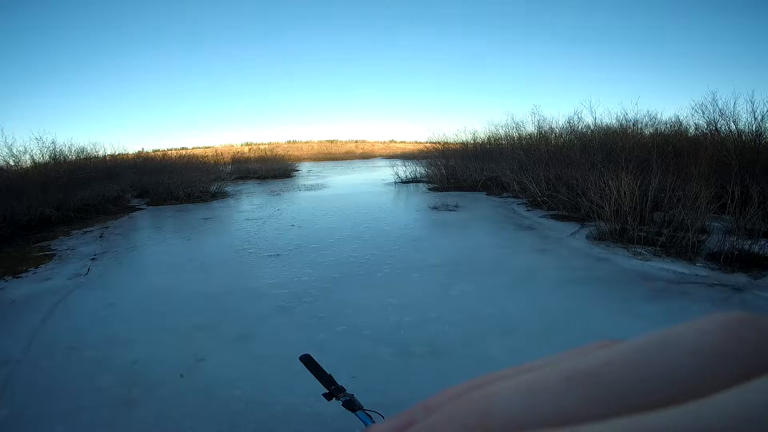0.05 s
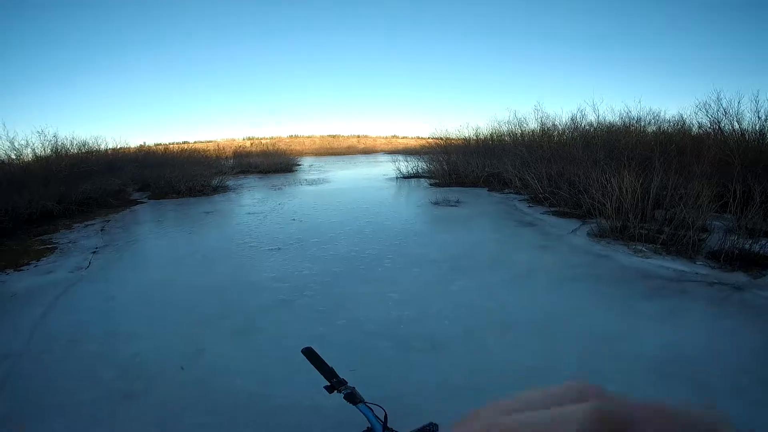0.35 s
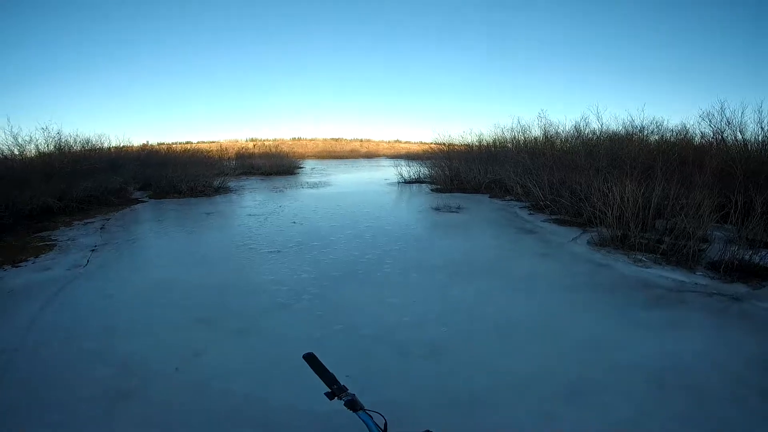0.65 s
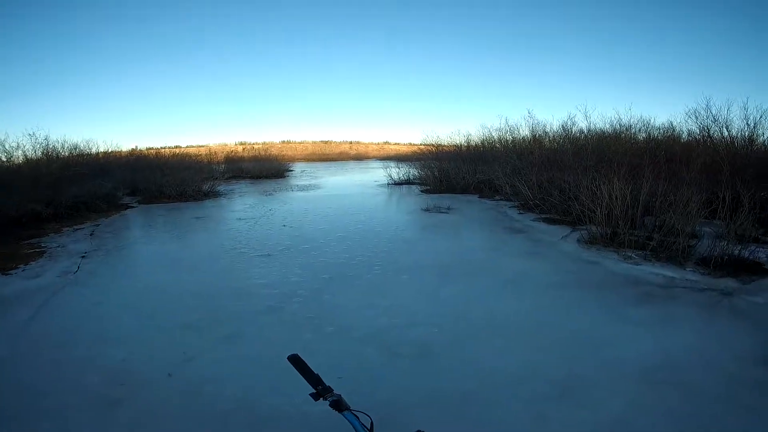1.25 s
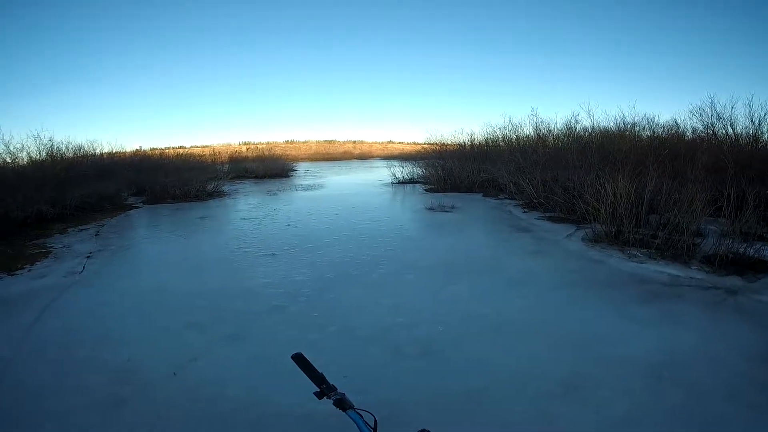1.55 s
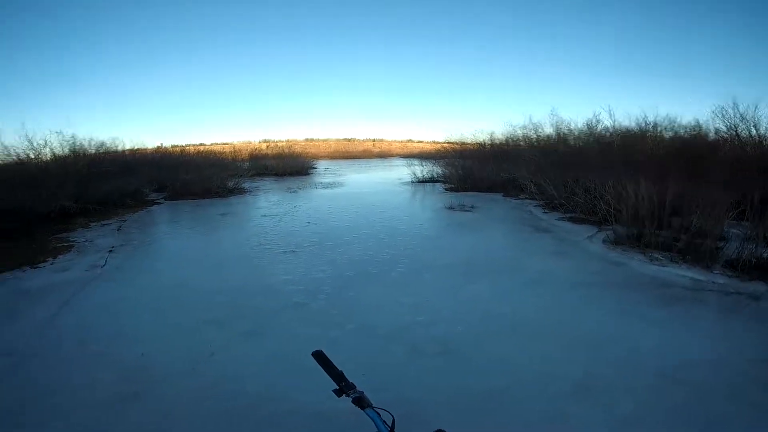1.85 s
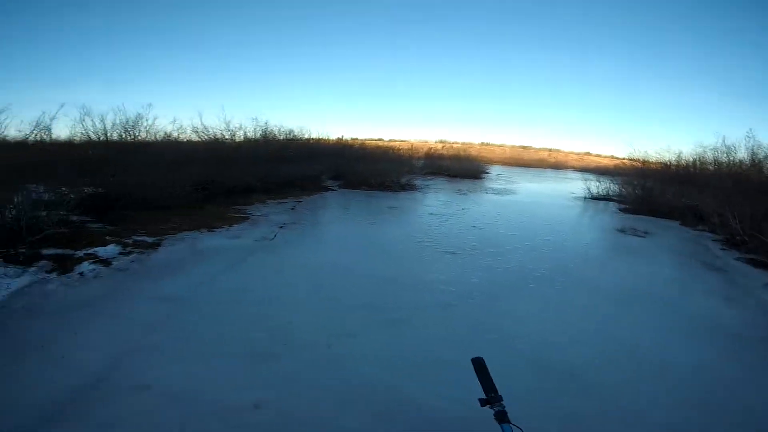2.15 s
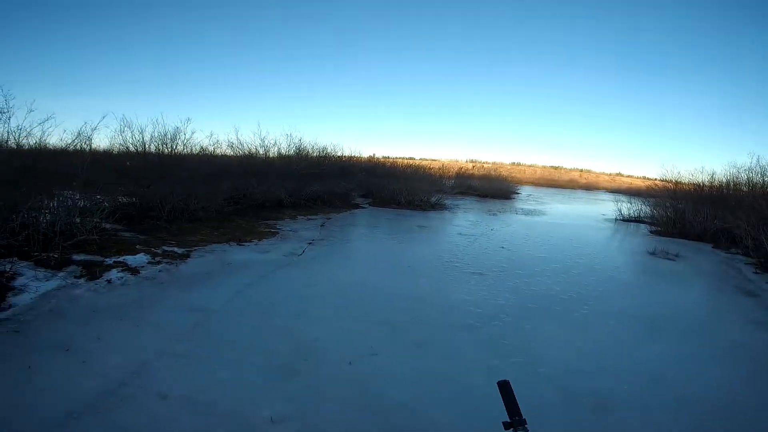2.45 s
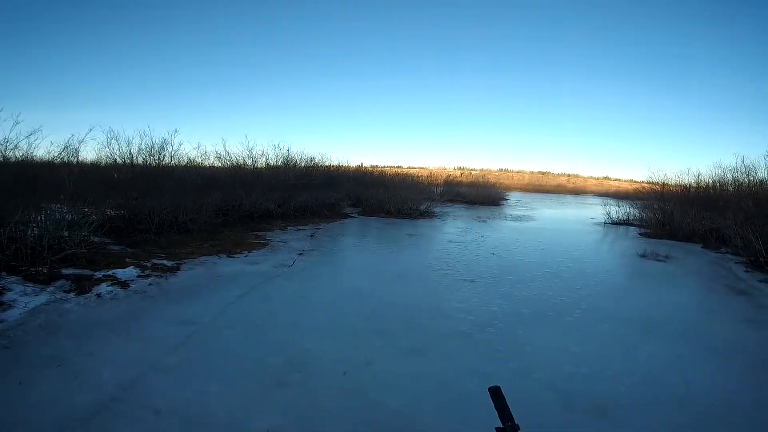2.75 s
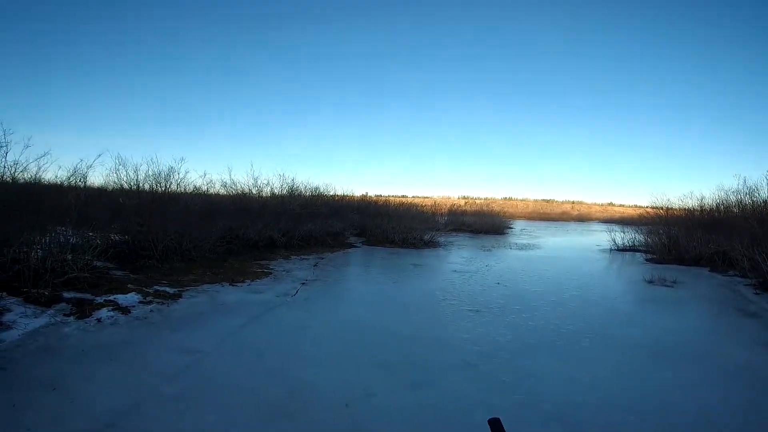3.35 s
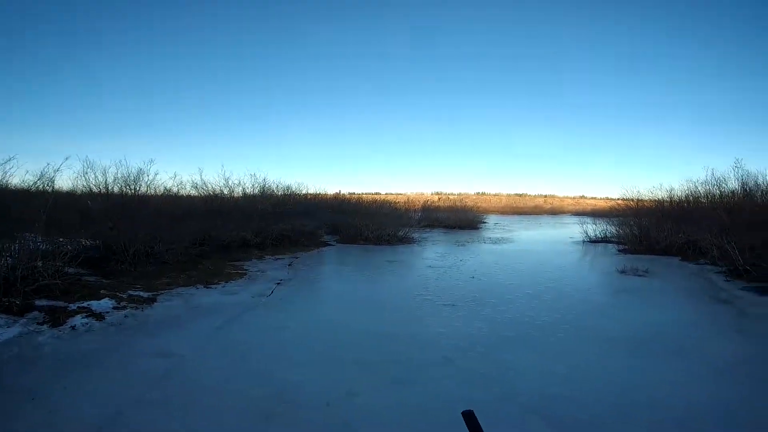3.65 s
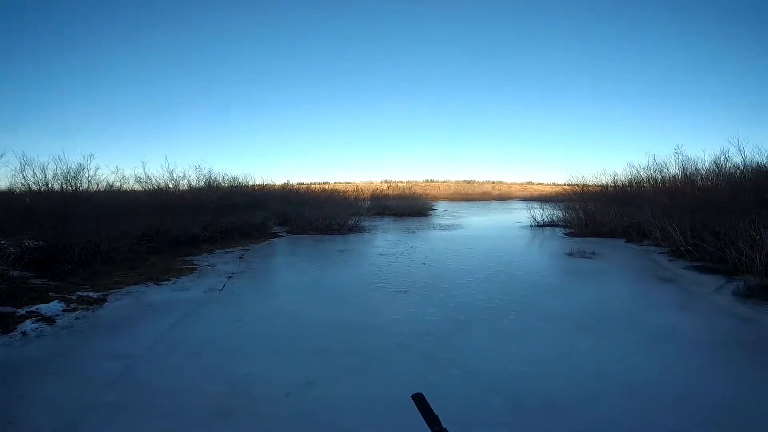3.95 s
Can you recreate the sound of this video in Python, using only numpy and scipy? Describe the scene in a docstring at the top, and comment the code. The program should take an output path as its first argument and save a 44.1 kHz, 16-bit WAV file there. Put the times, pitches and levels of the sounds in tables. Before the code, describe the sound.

Bicycle tyres roll and crunch over ice while wind buffets the microphone.

```python
"""A bicycle rolls over a frozen pond, heard from a camera on the rider. Sharp clacks and a short scuff
open the ride as it fades in. Then the tyres roar and crunch finely on the ice, a part of the bike rubs
in short sizzles and small knocks pass, while wind buffets the microphone and the camera's electronics
whine. Near the end the biggest wind thump lands; a limiter ducks after it, as after the opening clacks."""
import sys
import numpy as np
from scipy import signal
from scipy.fft import rfft, irfft
from scipy.io import wavfile
from scipy.ndimage import uniform_filter1d, minimum_filter1d

SR = 44100
rng = np.random.default_rng(int(sys.argv[2]) if len(sys.argv) > 2 else 0)


def inscribe(sig):
    """Save sig as 16-bit PCM at rate SR to the path in sys.argv[1].

    A 1-D sig is mono; a 2-D sig holds one channel per row.
    Samples are clipped to [-1, 1] before scaling.
    """
    pcm = np.round(np.clip(np.atleast_2d(sig).T, -1, 1) * 32767)
    wavfile.write(sys.argv[1], SR, pcm.astype(np.int16))


N = 176400
TIME = np.arange(N) / SR

# tone of the microphone's steady hiss (f/Hz, level/dB)
HISS_EQ = [(1000, -2.5), (4000, -12.5), (8800, -11), (9600, 0), (10400, -8), (12000, -2.5), (13800, 0.5),
           (14800, -10), (15500, -7)]
# faint tones beside the electronic whine (f/Hz, level/dB)
SIDE_TONES = [(7173, -63), (13486, -66), (14010, -65), (14683, -62), (14907, -63)]

# swells of the wind bed (t/s, level/dB)
WIND_ENVELOPE = [(.3, -18.5), (.5, -24), (.75, -27), (1.1, -29), (1.25, -36), (1.6, -33), (1.85, -24.5),
                 (2.2, -27), (2.55, -29.5), (2.85, -28.5), (3.0, -34), (3.3, -34), (3.6, -23), (3.78, -31),
                 (3.95, -25.5)]
# its deep rumble (f/Hz, level/dB)
WIND_EQ = [(10, -25), (25, 1), (45, 1), (75, -3.5), (110, -14), (200, -22.5), (400, -35), (1000, -96)]
# fluttering gusts (middle t/s, length/s, level/dB, upper edge f/Hz)
GUST_CUES = [(0.404, 0.073, -28.5, 216), (0.459, 0.032, -19, 181), (0.553, 0.025, -15.5, 130.6),
             (0.668, 0.074, -27.5, 125), (1.017, 0.027, -15, 81.4), (1.053, 0.014, -25.5, 195),
             (1.825, 0.062, -19.5, 116), (1.995, .04, -15, 110), (2.054, 0.069, -21, 112),
             (2.244, 0.057, -20.5, 86), (2.469, 0.03, -23.5, 125), (2.537, 0.064, -26, 110),
             (3.522, 0.0096, -20.5, 220), (3.646, .045, -15.5, 163), (3.829, 0.024, -17, 206),
             (3.929, 0.025, -17.5, 80.4)]
# single eddies that thump the microphone (t/s, peak level/dB, f/Hz)
EDDY_CUES = [(1.556, -14.5, 41.2), (1.691, -17.5, 48), (2.382, -10, 50.7), (3.076, -15.5, 44.8),
             (3.408, -24.5, 38.3), (3.5373, 6.5, 184), (3.574, -4.5, 39.8), (3.841, -10, 46)]

# light rubs on the bike (middle t/s, level/dB)
RUB_CUES = [(.81, -47), (.995, -46), (1.08, -48.5), (1.115, -52), (1.226, -48), (1.355, -47), (1.53, -48.5),
            (1.565, -57), (1.653, -48.5), (1.83, -46.5), (1.963, -47), (2.167, -52), (2.243, -52),
            (2.337, -50), (2.475, -48), (2.605, -48), (2.767, -47), (2.928, -49), (3.077, -49),
            (3.2, -48.5), (3.325, -47.5), (3.475, -48), (3.624, -46.5), (3.775, -49), (3.97, -47)]
# their high sizzle (f/Hz, level/dB)
RUB_EQ = [(3000, -33), (7500, -17), (8250, -6.5), (8900, -19), (9400, -0.5), (9900, 2), (10350, -18),
          (11000, -1), (11700, -5.5), (12600, -12), (15000, -18)]

# knocks of the bike and ticks in the ice (t/s, ring level/dB, ring f/Hz, tick level/dB)
KNOCK_CUES = [(.503, -24, 920, -54), (0.549, -31, 1360, -41), (.69, -28, 810, -54), (1.562, -27, 700, -55),
              (1.954, -21, 1123, -49), (2.459, -47, 890, -37), (2.531, -32, 910, -31.5),
              (2.698, -21, 830, -28), (2.718, -20.5, 563, -34), (2.925, -23.5, 780, -32.5),
              (3.268, -25.5, 440, -40.5), (3.684, -19, 434, -34.5), (3.798, -21, 493, -45)]
# bright edge of the ticks (f/Hz, level/dB)
TICK_EQ = [(1000, -29), (2000, 1), (3100, 3), (4500, -6), (7000, -9), (11000, -7), (15000, 1)]

# hard clacks close to the microphone (t/s, level/dB, t60/s)
CLACK_CUES = [(0.2727, -48, .04), (.2835, -18, 0.012), (0.2915, -33.5, 0.029), (.301, -46, 0.044),
              (0.308, -19, 0.077), (0.313, -28, .02), (0.3134, 0.5, 0.013)]
# their resonances (f/Hz, level/dB)
CLACK_EQ = [(100, -6), (600, -1), (850, -9), (1180, -0.5), (1600, -6), (2300, -6), (3000, 0.5),
            (3500, -2.5), (4400, -6), (5150, 1.5), (6600, -9.5), (8600, -9), (9600, 1.5), (11000, -1.5),
            (12500, -7), (15500, -18)]
# the scuff after them (t/s, level/dB)
SCUFF_ENVELOPE = [(.314, -66), (.32, -27.5), (.34, -26), (.346, -24), (.356, -23.5), (.36, -76)]
# its bright scrape (f/Hz, level/dB)
SCUFF_EQ = [(500, -11), (1800, -12), (3300, 0), (4800, -1), (5800, -7), (6400, 0), (8200, -2.5), (10700, 3),
            (12600, -2), (13400, -3), (15500, -12)]

# swells of the tyre roar, ahead of its trim (t/s, level/dB)
ROAR_ENVELOPE = [(0.38, -47), (0.48, -36.5), (0.62, -43), (0.74, -42), (0.83, -35), (1.0, -44.5),
                 (1.15, -47.5), (1.45, -45), (1.58, -40), (1.72, -43.5), (1.9, -40), (2.12, -41.5),
                 (2.3, -41), (2.55, -43), (2.65, -39.5), (2.85, -44), (3.07, -42), (3.33, -44.5),
                 (3.48, -40.5), (3.7, -40), (3.97, -38.5)]
# its hollow body (f/Hz, level/dB)
ROAR_EQ = [(60, -14), (200, -3.5), (400, -0.5), (600, -1), (830, 0), (1000, -5), (1180, -7), (1380, -17.5),
           (1600, -38.5), (2100, -31), (4000, -83)]
# swells of the tyres' higher rasp (t/s, level/dB)
RASP_ENVELOPE = [(.35, -49.5), (.5, -43), (.85, -44.5), (1.15, -58), (1.5, -56), (1.8, -52.5), (2.1, -46.5),
                 (2.3, -41), (2.55, -43.5), (2.85, -49.5), (3.1, -46.5), (3.33, -51.5), (3.5, -44),
                 (3.75, -45.5), (3.97, -40.5)]
# its narrow midrange (f/Hz, level/dB)
RASP_EQ = [(500, -34.5), (900, -6), (1130, -1.5), (1330, -4), (1480, -9), (1650, -27), (3000, -44.5)]
# hiss of ice grit under the tread, ahead of its trim (t/s, level/dB)
GRIT_ENVELOPE = [(0.38, -54), (0.47, -46), (0.53, -38), (0.6, -46.4), (0.68, -44), (0.75, -50.5),
                 (0.9, -50.5), (1.0, -51.5), (1.17, -57.5), (1.28, -53), (1.43, -58.5), (1.53, -50.5),
                 (1.6, -48.5), (1.75, -60), (1.9, -51.5), (2.08, -56.5), (2.2, -48.5), (2.42, -50.5),
                 (2.57, -48.5), (2.85, -52.5), (3.05, -50.5), (3.35, -57), (3.5, -55), (3.78, -52.5),
                 (3.9, -47.5), (3.98, -47)]
# its crisp top (f/Hz, level/dB)
GRIT_EQ = [(800, -7), (1700, -8.5), (2200, -5.5), (2900, 1), (3500, -2), (4100, -8.5), (5300, -5.5),
           (6600, -8), (7400, -4), (8400, -12.5), (9800, -4.5), (12000, -2), (13500, -21.5), (15500, -48)]

# fader over everything but the clacks and scuff (t/s, level/dB)
RIDE_FADER = [(0, -69), (.135, -75), (.155, -32.5), (.28, -17), (.4, 0.5), (.48, 0)]

WHINE_HZ, BUZZ_HZ, BUZZ_DEPTH, WHINE_DB, HISS_DB = 14346.5, 112.3, 0.68, -43.3, -50
GUST_ROLLOFF_DB_PER_OCTAVE = 25.5
KNOCK_T60_S, TICK_T60_S, KNOCK_RASP_GAIN = 0.025, 0.032, 0.39
GRAINS_PER_S, ROAR_TRIM_DB, GRIT_TRIM_DB = 2600, 1.5, 2.5
CEILING_DB, RELEASE_DB_PER_S, HIGH_CUT_HZ = -2, 74, 15500


def amp(db):
    """Decibels to gain."""
    return 10 ** (np.asarray(db) / 20)


def unit(x):
    """Scales to rms 1."""
    return x / np.sqrt(np.mean(x ** 2) + 1e-20)


def noise():
    """White noise for the whole scene."""
    return rng.standard_normal(N)


def envelope(points):
    """Gain over time from (t/s, level/dB) points."""
    return amp(np.interp(TIME, *np.transpose(points)))


def eq(x, points):
    """Minimum-phase EQ through (f/Hz, relative level/dB) points; white noise keeps its power."""
    hz, db = np.transpose(points)
    bins_hz = abs(np.fft.fftfreq(8192, 1 / SR))
    gain = unit(amp(np.interp(np.log(bins_hz + 1), np.log(hz), db)))
    response = np.exp(np.conj(signal.hilbert(np.log(gain))))
    taps = np.fft.ifft(response).real
    return signal.fftconvolve(x, taps[:len(taps) // 2])[:N]


def waver(rate_hz, depth_db):
    """A random gain that wanders at up to about rate_hz."""
    hz = np.fft.rfftfreq(N, 1 / SR)
    drift = unit(irfft(rfft(noise()) * np.exp(-(hz / rate_hz) ** 2), N))
    return unit(amp(depth_db * drift))


def swell(middle, length_s):
    """A rounded rise and fall with a broad top."""
    return 1 / (1 + (2 * (TIME - middle) / length_s) ** 6)


def decay(start, t60):
    """A hard attack that dies away."""
    return (TIME >= start) * np.exp(-np.log(1000) * np.maximum(TIME - start, 0) / t60)


def electronics():
    """The noise floor: the camera's thin buzzing whine and its faint side tones, over hiss."""
    buzz = 1 + BUZZ_DEPTH * np.cos(2 * np.pi * BUZZ_HZ * TIME)
    whine = amp(WHINE_DB) * buzz * np.sin(2 * np.pi * WHINE_HZ * TIME)
    faint = sum(amp(db) * np.sin(2 * np.pi * (hz * TIME + rng.random())) for hz, db in SIDE_TONES)
    hiss = amp(HISS_DB) * eq(noise(), HISS_EQ)
    return np.sqrt(2) * (whine + faint) + hiss  # tone levels are rms


def wind():
    """Air on the microphone: a low bed, fluttering gusts, and eddies of one pressure swing each."""
    air = envelope(WIND_ENVELOPE) * unit(eq(noise(), WIND_EQ)) * waver(rate_hz=4, depth_db=1.5)
    for t, length_s, db, edge_hz in GUST_CUES:
        three_octaves_up = (edge_hz * 2 ** 3, -GUST_ROLLOFF_DB_PER_OCTAVE * 3)
        gust_eq = [(15, -14), (edge_hz / 2, 0), (edge_hz, -2), three_octaves_up]
        window = swell(t, length_s)
        puff = eq(noise(), gust_eq) * window
        air += amp(db) * puff * np.linalg.norm(window) / np.linalg.norm(puff)
    for t, db, hz in EDDY_CUES:
        phase = 2 * np.pi * hz * (TIME - t)
        swing = 16 * phase / (3 + phase ** 2) ** 2  # a pull then a push, peaking at 1
        air += amp(db) * swing
    return air


def rubbing():
    """Something on the bike brushes lightly, about seven times a second, each touch a little ragged."""
    touches = sum(amp(db) * swell(t, length_s=0.04) for t, db in RUB_CUES)
    ragged = waver(rate_hz=160, depth_db=2.5)
    return eq(touches * ragged * noise(), RUB_EQ)


def knocks():
    """Small bumps give a hollow, slightly rasping ring and a bright tick."""
    ring, body, snap = np.zeros((3, N))
    for t, ring_db, hz, tick_db in KNOCK_CUES:
        tail = amp(ring_db) * decay(t, KNOCK_T60_S)
        ring += tail * np.sin(2 * np.pi * hz * (TIME - t))
        body += tail
        snap += amp(tick_db) * decay(t, TICK_T60_S)
    rasp = eq(body * noise(), ROAR_EQ)
    tick = eq(snap * noise(), TICK_EQ)
    return ring + KNOCK_RASP_GAIN * rasp + tick


def clacks_and_scuff():
    """A quick run of hard clacks beside the microphone, ending in a scuff."""
    clacks = sum(amp(db) * decay(t, t60) for t, db, t60 in CLACK_CUES) * noise()
    gate = (TIME > SCUFF_ENVELOPE[0][0]) * (TIME < SCUFF_ENVELOPE[-1][0])
    scuff = envelope(SCUFF_ENVELOPE) * gate * noise()
    return eq(clacks, CLACK_EQ) + eq(scuff, SCUFF_EQ)


def ice_crunch(spread_db):
    """A dense train of tiny fractures of uneven size."""
    size = amp(spread_db * np.minimum(rng.exponential(1, N), 5))
    polarity = rng.choice([-1, 1], N)
    cracks = rng.random(N) < GRAINS_PER_S / SR
    return unit(size * polarity * cracks)


def tyres():
    """The tread crushes ice: a hollow roar, a higher rasp that grows in the turn, and a gritty hiss."""
    roar = eq(ice_crunch(spread_db=2.5), ROAR_EQ) * waver(rate_hz=4.7, depth_db=1.64)
    rasp = eq(ice_crunch(spread_db=2.5), RASP_EQ)
    fine_crunch = unit(ice_crunch(spread_db=3.5) + 1.4 * noise())
    grit = eq(fine_crunch, GRIT_EQ) * waver(rate_hz=22, depth_db=1.2)
    return (amp(ROAR_TRIM_DB) * envelope(ROAR_ENVELOPE) * roar
            + envelope(RASP_ENVELOPE) * rasp
            + amp(GRIT_TRIM_DB) * envelope(GRIT_ENVELOPE) * grit)


def scene():
    """The mono mix: the ride fades in under the opening clacks."""
    ride = tyres() + rubbing() + knocks() + wind() + electronics()
    return (envelope(RIDE_FADER) * ride + clacks_and_scuff())[None]


def record(dry):
    """A look-ahead peak limiter with a steady release, then a high cut."""
    over_db = np.maximum(20 * np.log10(abs(dry[0]) + 1e-9) - CEILING_DB, 0)
    release_db = TIME * RELEASE_DB_PER_S
    gain_db = release_db - np.maximum.accumulate(over_db + release_db)
    gain_db = uniform_filter1d(minimum_filter1d(gain_db, size=41), size=41)  # ducks about 1 ms early
    high_cut = signal.firwin(255, HIGH_CUT_HZ, window=("kaiser", 9), fs=SR)
    return signal.oaconvolve(dry * amp(gain_db), high_cut[None], "same")


dry = scene()
out = record(dry)
inscribe(out)
```